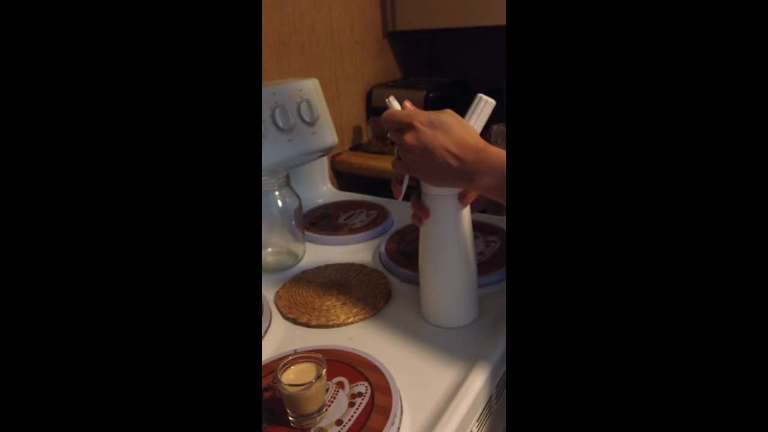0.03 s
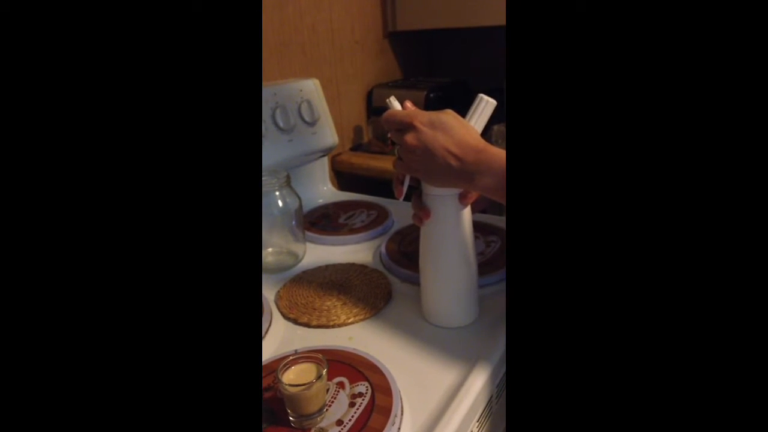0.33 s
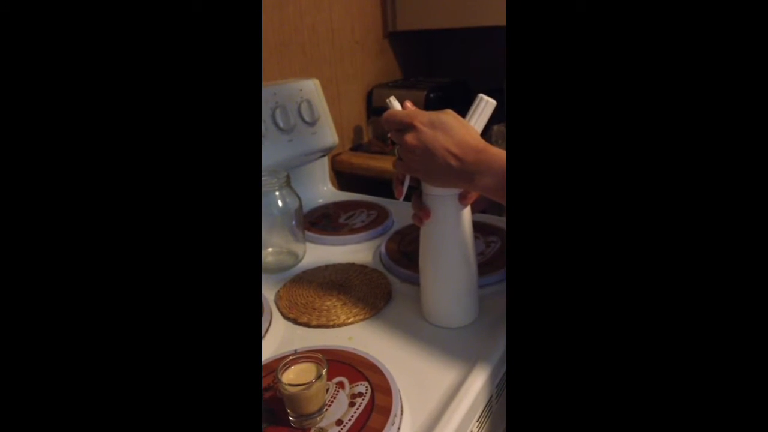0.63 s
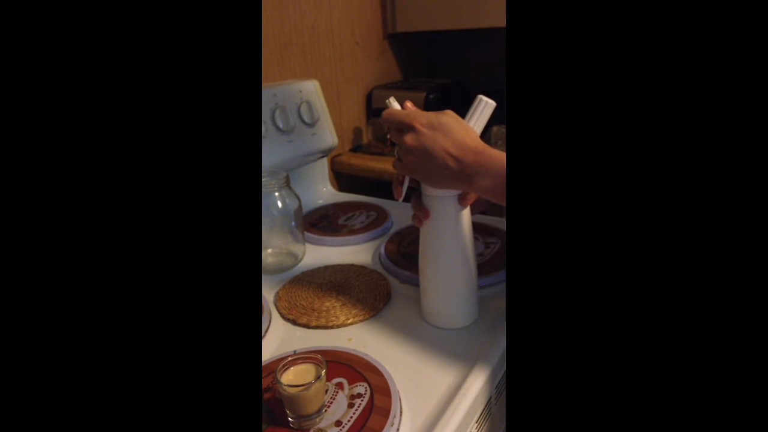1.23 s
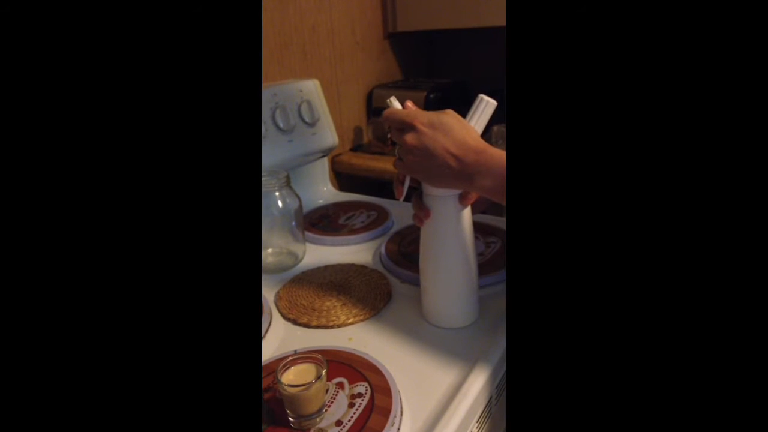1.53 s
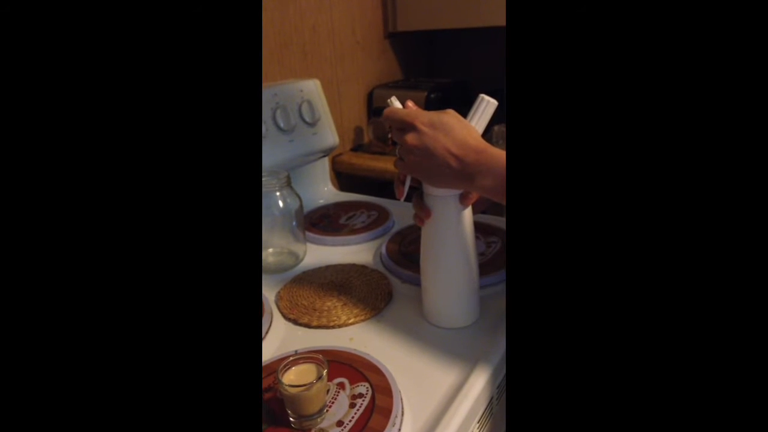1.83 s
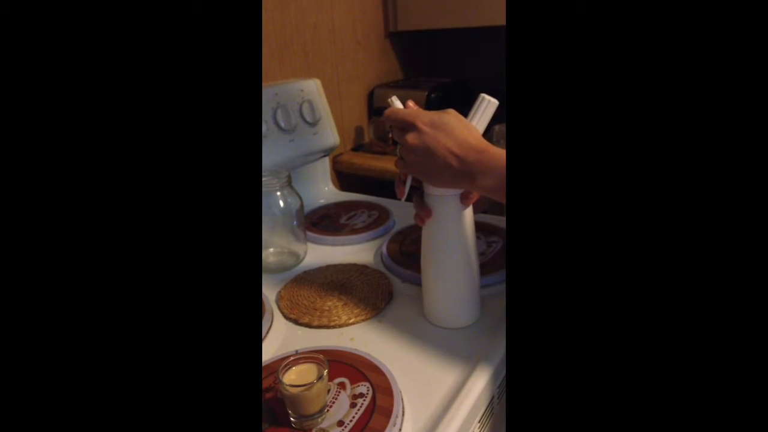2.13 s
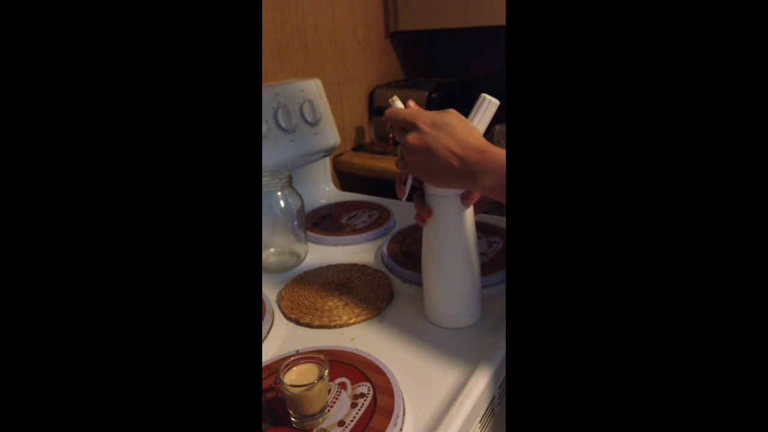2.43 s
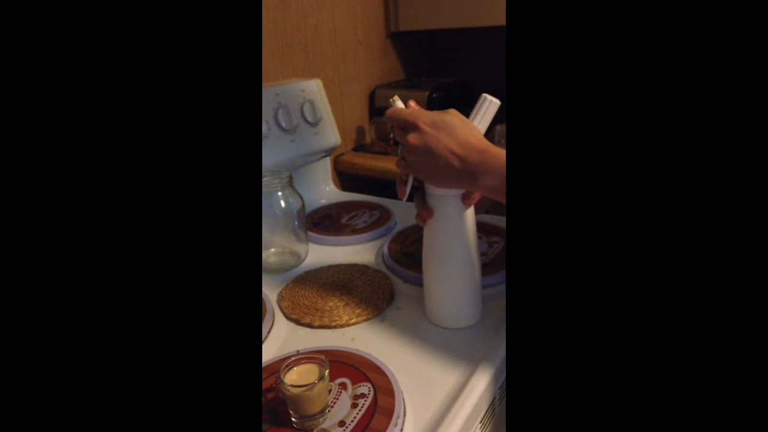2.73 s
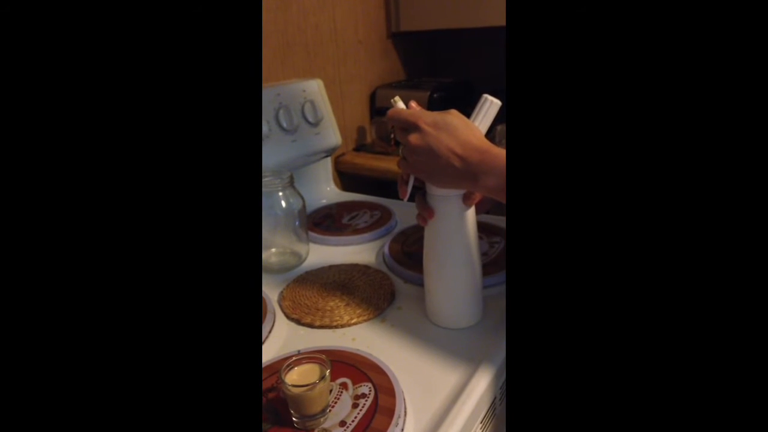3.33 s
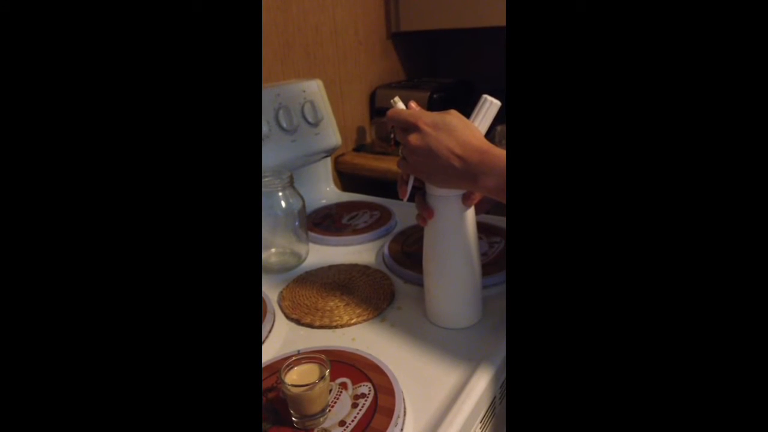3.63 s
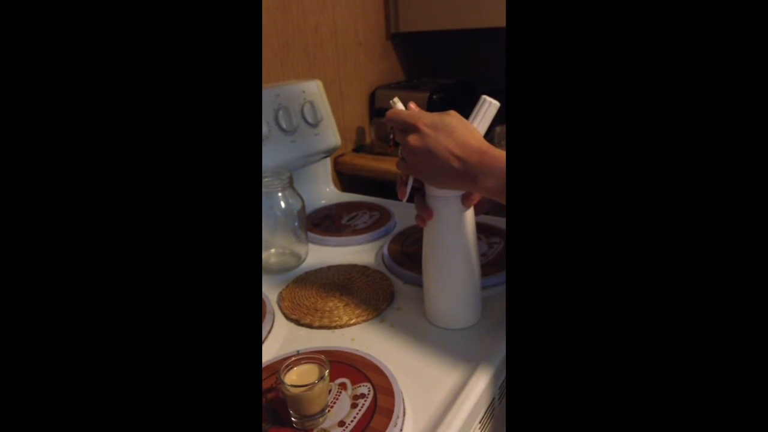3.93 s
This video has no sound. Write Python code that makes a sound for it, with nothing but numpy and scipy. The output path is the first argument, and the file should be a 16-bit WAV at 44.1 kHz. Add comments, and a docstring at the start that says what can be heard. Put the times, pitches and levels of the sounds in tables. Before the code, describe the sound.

Gas hisses and sputters out of a cream dispenser, in short bursts, then steadily.

```python
"""A kitchen appliance hums softly, and a hand-held cream dispenser ticks faintly as it is handled. Gas hisses
out of the valve in a few hesitant bursts, squeaking through the narrow gap, then keeps flowing. Plugs of cream
pop in the nozzle, one by one at first, then as a dense sputter under the strong hiss. The dispenser rings a
little, and the stove's hard surfaces close by echo it all."""
import sys
import numpy as np
from scipy import signal
from scipy.fft import rfft, irfft
from scipy.io import wavfile

SR = 44100
rng = np.random.default_rng(int(sys.argv[2]) if len(sys.argv) > 2 else 0)


def output_pcm(signal):
    """Save a mono or channel-first signal as 16-bit PCM at the path in sys.argv[1].

    Samples are clipped to [-1, 1] before scaling.
    """
    pcm = np.clip(np.atleast_2d(signal).T, -1, 1) * 32767
    wavfile.write(sys.argv[1], SR, np.round(pcm).astype(np.int16))


N = 176400
TIME = np.arange(N) / SR


def from_db(db):
    """Turn decibels into a number to multiply by."""
    return 10 ** (np.asarray(db) / 20)

def unit_power(x):
    """Scale a signal to an average power of 1."""
    return x / np.sqrt(np.mean(x ** 2) + 1e-20)

def curve(rows):
    """Join (seconds, value) points with straight lines."""
    return np.interp(TIME, *np.transpose(rows))

def drift(rate_hz):
    """A smooth random wander, about 1 in size."""
    r = np.exp(-2 * np.pi * rate_hz / SR)
    return unit_power(signal.lfilter([1], [1, -2 * r, r * r], rng.standard_normal(N + SR))[SR:])

def ring_of(colour, size=4096):
    """The short ring of a tap with this colour (how strong each frequency is)."""
    hz, db = np.transpose(colour)
    grid = np.maximum(np.fft.rfftfreq(size, 1 / SR), 1)
    gains = from_db(np.interp(np.log(grid), np.log(hz), db))
    front_load = 1 + np.sign(size / 2 - np.arange(size))  # packs the energy at the start
    ring = irfft(np.exp(rfft(irfft(np.log(gains)) * front_load)))
    return ring / np.linalg.norm(ring)

def through(x, response):
    """Play a signal through a ring or an echo."""
    return signal.fftconvolve(x, response)[:N]

def clicks(per_s, spread_db):
    """Random clicks of uneven size."""
    sizes = from_db(spread_db * np.minimum(rng.exponential(1, N), 3))
    signs = rng.choice([-1, 1], N)
    return unit_power(sizes * signs * (rng.random(N) < per_s / SR))


# The appliance's tones. Each row: pitch in Hz, level in dB.
HUM_TONES = [(120, -69), (177.6, -67.5), (416, -57)]
# The room's rumble. Each row: frequency in Hz, relative level in dB.
ROOM_COLOUR = [(18, -57), (30, -24), (176, -8), (328, -3), (415, -4.5), (448, -12), (662, -18), (735, -18),
               (1690, -23.5), (2130, -18), (3230, -30.5), (15000, -48)]

def hum_and_rumble():
    """An appliance hums steadily over the soft noise of the room."""
    hum = sum(from_db(db) * np.sqrt(2) * np.sin(2 * np.pi * (hz * TIME + rng.random()))
              for hz, db in HUM_TONES)
    rumble = through(rng.standard_normal(N), ring_of(ROOM_COLOUR))
    return hum + from_db(-52.1) * rumble


# The bright snap in a tick or pop. Each row: frequency in Hz, relative level in dB.
SNAP_COLOUR = [(200, -52), (2100, -12), (2800, -19.5), (3750, -4), (4400, -0.5), (5200, -21.5),
               (6800, -9.5), (15000, -39)]

def snaps(starts, levels_db, decay_s=0.0038):
    """Bursts of bright noise that start sharply and die at once."""
    envelope = sum(gain * (TIME >= start) * np.exp(-np.abs(TIME - start) / decay_s)
                   for start, gain in zip(starts, from_db(levels_db)))
    return through(envelope * rng.standard_normal(N), ring_of(SNAP_COLOUR))


# Ticks from handling the dispenser. Each row: start in seconds, level in dB.
HANDLING_TICKS = [(0.061, -83), (0.141, -55), (0.253, -65)]

def handling_ticks():
    """The dispenser ticks faintly as it is handled, before the valve opens."""
    return snaps(*np.transpose(HANDLING_TICKS))


def waver(x, depth_db=2.5, rate_hz=38):
    """Split the hiss into five bands and let each waver on its own."""
    wavering, rest = 0, x
    for hz in np.geomspace(6500, 13000, 5):
        band = signal.sosfiltfilt(signal.butter(4, hz, fs=SR, output="sos"), rest)
        wavering = wavering + band * from_db(depth_db * drift(rate_hz))
        rest = rest - band
    return unit_power(wavering + rest)


# Loudness of the first bursts, the open stream and the nozzle's ring near 4 kHz.
# Each row: time in seconds, relative level in dB.
BURST_LEVELS = [(0.385, -79), (0.43, -40.5), (0.52, -36.5), (0.545, -43.5), (0.59, -38.5), (0.68, -66.5),
                (0.765, -38), (0.795, -58), (0.85, -34), (0.88, -42.5), (0.924, -33), (0.94, -19.5),
                (0.975, -15.5), (1.016, -19), (1.18, -56.5), (1.28, -62), (1.31, -48), (1.35, -68)]
STREAM_LEVELS = [(1.42, -39), (1.68, -31), (1.83, -32.5), (1.93, -25.5), (1.96, -29.5), (2.12, -22),
                 (2.29, -15), (2.44, -16), (2.57, -24.5), (2.69, -21), (2.73, -25), (2.78, -22.5),
                 (2.92, -28.5), (3.06, -22.5), (3.2, -25), (3.55, -28), (3.66, -17.5), (3.69, -22.5),
                 (3.88, -27.5), (4.0, -25)]
NOZZLE_LEVELS = [(0.39, -80), (0.43, -47.5), (0.61, -51.5), (0.68, -60), (0.76, -51), (0.8, -55.5),
                 (0.92, -45), (0.96, -29.5), (1.02, -29.5), (1.1, -50), (1.35, -65.5), (1.46, -44.5),
                 (1.92, -39), (2.1, -37), (2.2, -26.5), (2.44, -24), (2.56, -32), (2.95, -33.5),
                 (3.06, -24), (3.16, -33.5), (3.36, -26), (3.5, -33.5), (3.66, -28), (3.86, -38),
                 (4.0, -30.5)]
# Colours of the hiss with cream in the way, the clear hiss and the nozzle's ring.
# Each row: frequency in Hz, relative level in dB.
WET_COLOUR = [(200, -83), (3000, -23.5), (4700, -11.5), (5400, -12), (5900, -3), (7300, -1), (7900, -4.5),
              (9300, -1), (10400, 1.5), (11200, -5), (12400, -3.5), (13600, -4.5), (15200, -7)]
CLEAR_COLOUR = [(200, -45), (3000, -41.5), (4700, -17.5), (5400, -17.5), (5850, -6), (6300, 0), (7100, -2),
                (7700, -8.5), (8700, -0.5), (10200, 0.5), (11700, -3), (13600, 0.5), (15200, -9.5)]
NOZZLE_COLOUR = [(200, -70), (2200, -24), (2900, -28.5), (3350, -15), (3720, 4.5), (3950, -1.5), (4400, 4),
                 (4750, -11), (5400, -14), (8000, -73)]

def gas_hiss(clears_from_s=2.124, clears_by_s=2.38, calm_by_s=2.56):
    """The jet crackles with droplets and flutters, then smooths out as the nozzle blows clear."""
    cleared = np.clip((TIME - clears_from_s) / (clears_by_s - clears_from_s), 0, 1)
    flutter_db = 1.94 * np.clip(2 * (calm_by_s - TIME), .35, 1)
    flutter = from_db(flutter_db * drift(rate_hz=44))
    rush = rng.standard_normal(N)
    droplets = from_db(-15) * clicks(per_s=250, spread_db=8)
    wet = from_db(-.5) * waver(through(rush + droplets, ring_of(WET_COLOUR)))
    clear = from_db(4) * through(rush + droplets, ring_of(CLEAR_COLOUR))
    flow = from_db(curve(np.vstack([BURST_LEVELS, STREAM_LEVELS])))
    jet = flow * ((1 - cleared) * wet + cleared * clear)
    nozzle_ring = through(rng.standard_normal(N), ring_of(NOZZLE_COLOUR))
    return flutter * (jet + from_db(curve(NOZZLE_LEVELS) - 1.5) * nozzle_ring)


# Gas squeaks. Each row: start in seconds, level in dB, first pitch in Hz, slide in Hz per second.
SQUEAKS = [(0.407, -46, 3280, 169995), (1.370, -46.5, 3260, 140000), (1.948, -37, 3294, -40000)]

def gas_squeaks(length_s=0.014, roughness=0.93):
    """Gas squeezes through a barely open gap in a rough, fast-sliding whistle."""
    out = np.zeros(N)
    for start, db, hz, slide in SQUEAKS:
        t = np.clip(TIME - start, 0, length_s)
        phase = 2 * np.pi * (hz * t + slide * t * t / 2)
        swell = from_db(db) * np.sin(np.pi * t / length_s)
        out += swell * np.sin(phase + roughness * drift(rate_hz=900))
    return out


# Bursting plugs. Each row: start in seconds, relative level in dB, dB added for the snap only.
CREAM_POPS = [(0.454, -28.5, 2.5), (0.496, -25, -17), (0.531, -24.5, -7.5), (0.595, -23, -15),
              (0.63, -27.5, -5.5), (0.731, -23.5, -21), (0.764, -25, -9), (0.866, -22.5, -9.5),
              (1.065, -34, -14), (1.22, -27, -21), (1.311, -23, -12.5), (1.432, -22, -12), (1.479, -21, -7),
              (1.515, -22, -10), (1.562, -23, -5.5), (1.614, -24.5, -16.5), (1.643, -21, -12),
              (1.687, -23, -9), (1.709, -22, -11), (1.789, -20, -23), (1.812, -26, -18), (1.84, -20, -12),
              (1.9, -20.5, -9), (1.948, -19.5, -10), (1.994, -27, -2), (2.043, -24, -18)]
# A pop's hollow ring. Each row: frequency in Hz, relative level in dB.
POP_COLOUR = [(100, -62), (600, -20), (740, -8), (860, 2), (1050, 5.5), (1240, 8.5), (1400, -1),
              (1720, -11), (2000, -42), (6000, -68)]

def cream_pops(pitch_spread=.035, colour_spread_db=2.2):
    """Each bursting plug gives a hollow ring of its own and a brighter snap of gas."""
    starts, levels_db, snap_db = np.transpose(CREAM_POPS)
    hz, colour_db = np.transpose(POP_COLOUR)
    rings = np.zeros(N + SR)
    for at, peak in zip((starts * SR).astype(int), from_db(levels_db - .5)):
        own_hz = hz * np.exp(pitch_spread * rng.standard_normal())
        own_db = colour_db + colour_spread_db * rng.standard_normal(len(hz))
        ring = ring_of(np.column_stack([own_hz, own_db]))
        rings[at:at + len(ring)] += peak * ring / np.abs(ring).max()
    return rings[:N], snaps(starts, levels_db + snap_db - 3)


# The dispenser's own notes. Each row: pitch in Hz, strength in dB, seconds to fade by 60 dB.
DISPENSER_NOTES = [(871.5, -53.5, 0.064), (1246.4, -61, 0.22)]

def dispenser_ring(x):
    """The dispenser rings on faintly after the cream shakes it."""
    t = TIME[:SR // 2]
    ring = sum(from_db(db - 60 * t / fade_s) * np.cos(2 * np.pi * hz * t)
               for hz, db, fade_s in DISPENSER_NOTES)
    return x + through(x, ring)


def resonate(x, hz, width_hz, block=128):
    """Bring out a narrow band of sound around a moving pitch."""
    out, state = np.zeros(N), np.zeros(2)
    r = np.exp(-np.pi * width_hz / SR)
    for i in range(0, N, block):
        feedback = [1, -2 * r * np.cos(2 * np.pi * hz[i] / SR), r * r]
        out[i:i + block], state = signal.lfilter([1, 0, -1], feedback, x[i:i + block], zi=state)
    return out


# Loudness of the sputter. Each row: time in seconds, relative level in dB.
SPUTTER_LEVELS = [(0.92, -64), (0.941, -29.5), (1.0, -30), (1.03, -38), (1.075, -38.5), (1.11, -70),
                  (1.38, -56), (1.5, -50.5), (1.9, -51.5), (1.96, -41), (2.02, -48.5), (2.07, -35.5),
                  (2.11, -42), (2.155, -28.5), (2.35, -31.5), (2.46, -33), (2.55, -39.5), (2.62, -41),
                  (2.745, -33.5), (2.765, -49), (2.82, -43.5), (2.85, -37.5), (2.97, -39), (3.02, -36.5),
                  (3.4, -39.5), (3.51, -43), (3.61, -33), (3.65, -31), (3.72, -46.5), (3.89, -52),
                  (3.98, -33)]
# Colour of the spray. Each row: frequency in Hz, relative level in dB.
SPRAY_COLOUR = [(80, -52), (650, -19.5), (860, -7.5), (1200, -1.5), (1450, -8.5), (1750, -8.5),
                (1950, -21.5), (2800, -23.5), (6000, -41)]
# The gurgle sinks as a spurt empties the nozzle. Each row: time in seconds, pitch in Hz.
GURGLE_PITCHES = [(0.95, 1040), (1.08, 840), (2.0, 980), (2.28, 1120), (2.46, 890), (2.6, 1036),
                  (3.65, 1114)]

def cream_sputter():
    """Shreds of cream hit the nozzle in quick, uneven lumps, making a spray and a sliding gurgle."""
    spits = unit_power(clicks(per_s=420, spread_db=2) + .5 * rng.standard_normal(N))
    spray = through(spits, ring_of(SPRAY_COLOUR))
    gurgle = unit_power(resonate(spray, curve(GURGLE_PITCHES), width_hz=120))
    lumps = from_db(2.2 * drift(rate_hz=32))
    sputter = unit_power(lumps * (from_db(-3) * spray + from_db(-1) * gurgle))
    return from_db(curve(SPUTTER_LEVELS) + 1) * sputter


# Echoes off the stove top and its back panel. Each row: delay in milliseconds, relative strength.
STOVE_ECHOES = [(5.8, 0.32), (8.3, .26), (10.6, .28), (15.5, 0.24)]

def kitchen(x, echo_share, fade_s=0.18, tail_delay_s=.012):
    """The sound arrives directly, then off the stove, then as a short wash from the room."""
    t = TIME[:SR // 2]
    tail = rng.standard_normal(len(t)) * from_db(-60 * t / fade_s) * (t > tail_delay_s)
    response = from_db(-12.5) * tail / np.linalg.norm(tail)
    response[0] = 1
    for ms, strength in STOVE_ECHOES:
        response[int(ms * SR / 1000)] += strength * echo_share
    return through(x, response)


def scene():
    """The dispenser in the kitchen; its low sounds echo a little more than its high ones."""
    pop_rings, pop_snaps = cream_pops()
    ticks = handling_ticks()
    low = kitchen(dispenser_ring(pop_rings + cream_sputter()), echo_share=0.87)
    high = kitchen(ticks + gas_hiss() + gas_squeaks() + pop_snaps, echo_share=0.81)
    return (low + high + hum_and_rumble())[None]

def record(dry, attack_s=0.31, threshold_db=-25.5, recovery_db_per_s=3, cutoff_hz=15450):
    """A slow volume control turns loud stretches down, and the highest treble is cut steeply."""
    r = np.exp(-1 / (attack_s * SR))
    loudness_db = 10 * np.log10(signal.lfilter([1 - r], [1, -r], dry[0] ** 2) + 1e-12)
    wanted_cut_db = .5 * np.maximum(loudness_db - threshold_db, 0)
    recovery_db = recovery_db_per_s * TIME
    cut_db = np.maximum.accumulate(wanted_cut_db + recovery_db) - recovery_db
    treble_cut = signal.ellip(12, .2, 90, cutoff_hz, fs=SR, output="sos")
    return signal.sosfilt(treble_cut, dry * from_db(-cut_db))


dry = scene()
out = record(dry)
output_pcm(out)
```